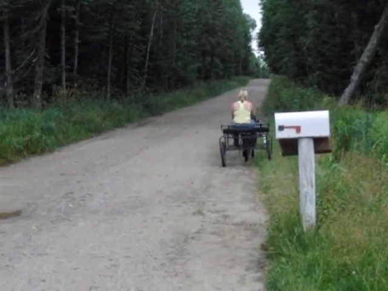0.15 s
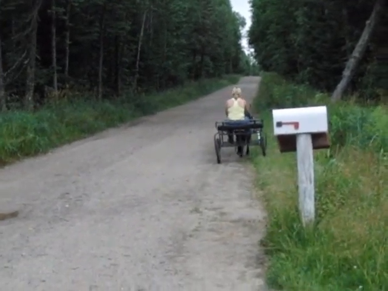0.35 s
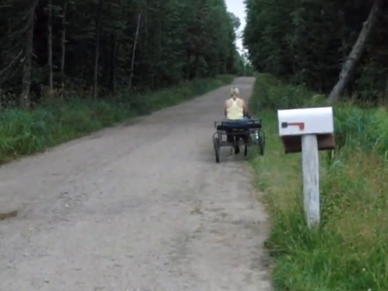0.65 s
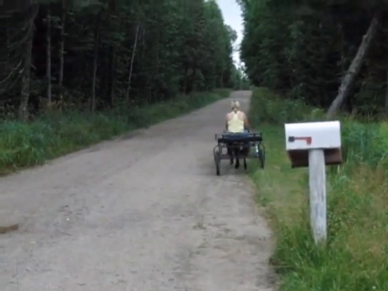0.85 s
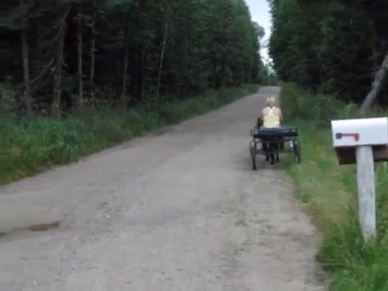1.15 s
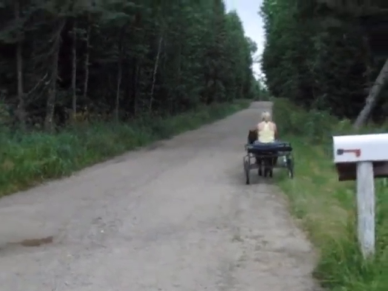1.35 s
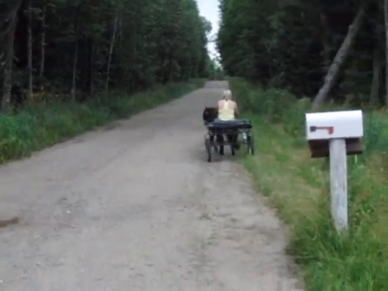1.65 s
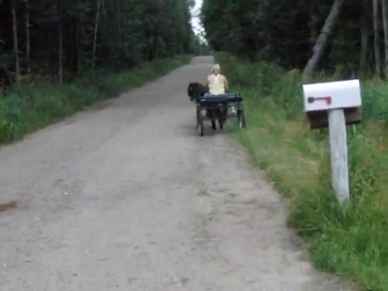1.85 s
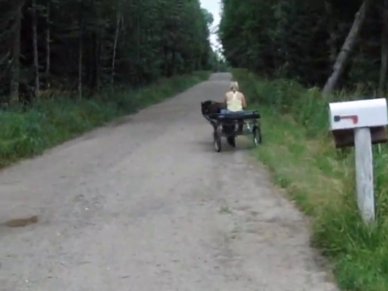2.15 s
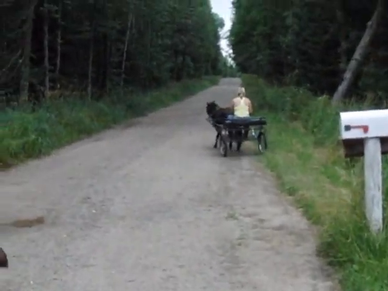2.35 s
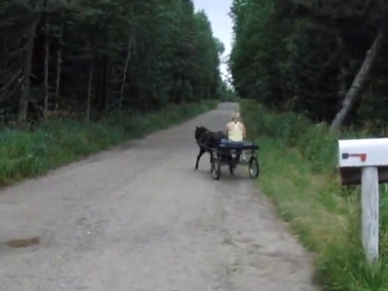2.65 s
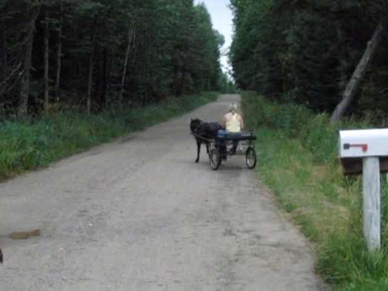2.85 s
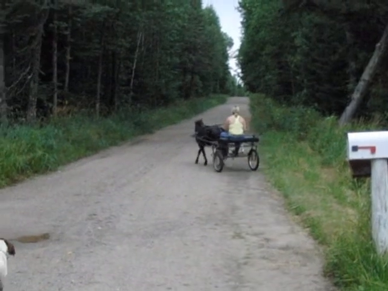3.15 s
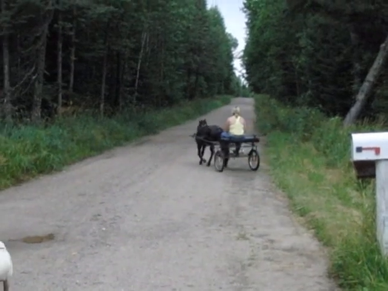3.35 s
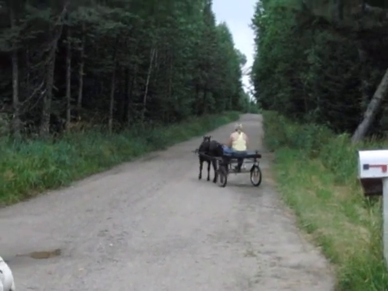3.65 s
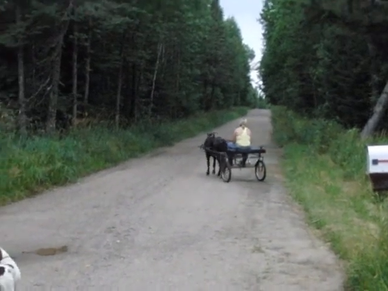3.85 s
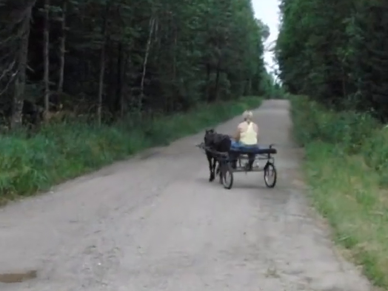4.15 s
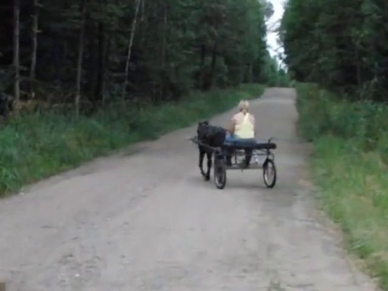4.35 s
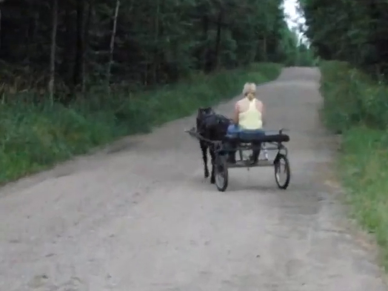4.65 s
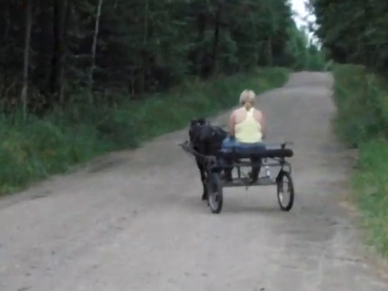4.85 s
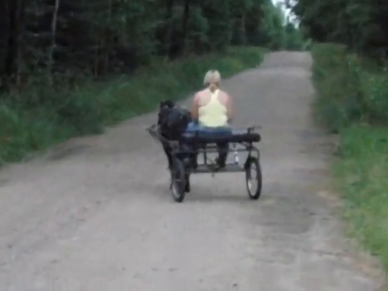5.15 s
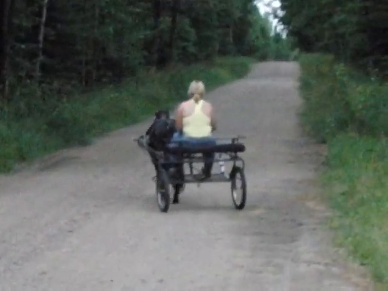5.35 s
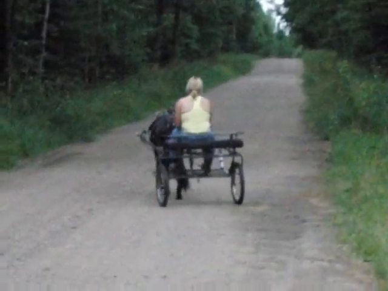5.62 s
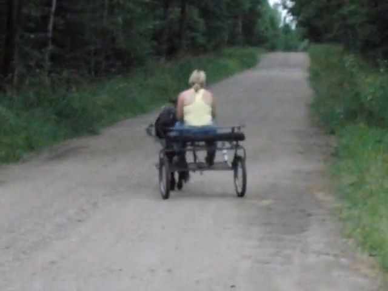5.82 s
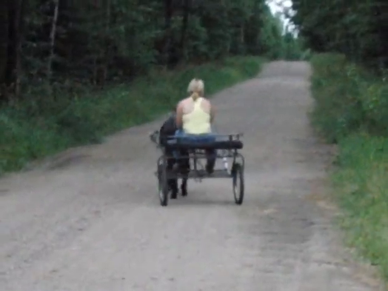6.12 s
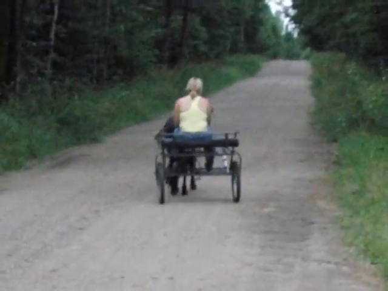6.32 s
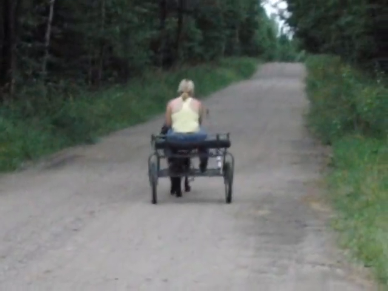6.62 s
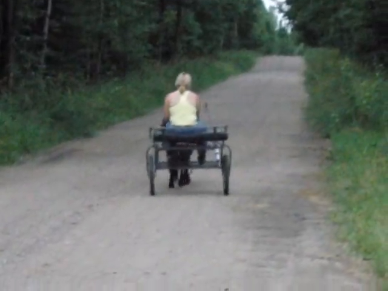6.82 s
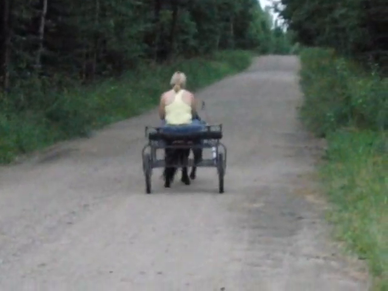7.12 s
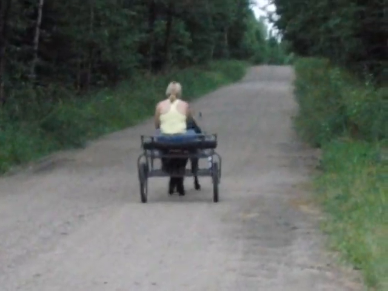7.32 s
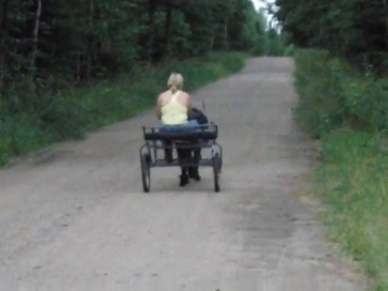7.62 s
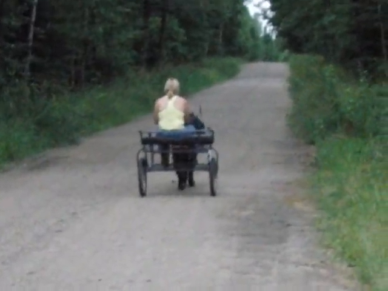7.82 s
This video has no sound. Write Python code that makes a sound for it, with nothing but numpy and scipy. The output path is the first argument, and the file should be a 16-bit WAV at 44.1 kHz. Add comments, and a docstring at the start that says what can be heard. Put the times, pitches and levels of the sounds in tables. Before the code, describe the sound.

A small horse pulls a cart away along a gravel road, hooves crunching and stones cracking under steady hiss, then one sharp loud snap close by.

```python
"""Over a small camera's hiss, a pony walks a two-wheeled cart away along a gravel road in the woods.
From the start tyres tick through pebbles, hooves crunch grit, stones ring briefly, and trees echo it all;
an earlier call of a far bird still rings. Soft buffets of pressure follow near 1 s.
Near 3.7 s fingers stick and slip on the camera; the bird calls twice more in arching notes.
At 5.2 s one sharp snap rings the case and ducks the gain, which creeps back as the cart walks on."""
import sys
import numpy as np
from scipy import signal
from scipy.fft import rfft, irfft
from scipy.io import wavfile
from scipy.ndimage import uniform_filter1d

SR = 44100
rng = np.random.default_rng(int(sys.argv[2]) if len(sys.argv) > 2 else 0)


def materialize(psi):
    """Save the field psi as 16-bit PCM at rate SR to the path in sys.argv[1].

    A 1-D psi becomes a single channel; in a 2-D psi each row is a channel.
    """
    bounded = np.clip(np.atleast_2d(psi).T, -1, 1)
    quanta = np.round(bounded * 32767).astype(np.int16)
    wavfile.write(sys.argv[1], SR, quanta)


N = 351918
TIME, HZ = np.arange(N) / SR, np.fft.rfftfreq(N, 1 / SR)


def gain_of(db):
    """Decibels to amplitude."""
    return 10 ** (np.asarray(db) / 20)


def evened(x):
    """Scales to rms 1."""
    return x / np.sqrt(np.mean(x ** 2) + 1e-20)


def read(points, hz):
    """A spectrum joined by straight lines over log frequency."""
    f, value = np.transpose(points)
    return np.interp(np.log(hz + 1), np.log(f + 1), value)


def bells(rows, hz):
    """Peaks and notches summed in dB."""
    return sum(db / (1 + (2 * (hz - f) / width) ** 2) for f, width, db in rows)


def coloured(x, points):
    """Gives a sound a spectrum, at rms 1."""
    spectrum = rfft(x) * gain_of(read(points, np.fft.rfftfreq(len(x), 1 / SR)))
    return evened(irfft(spectrum, len(x)))


def add(mix, s, sound):
    """Mixes a sound in at a time in seconds."""
    part = mix[max(round(s * SR), 0):][:len(sound)]
    part += sound[:len(part)]


def decay(t, t60):
    """An exponential fade that falls 60 dB in t60 seconds."""
    return np.exp(-np.log(1000) * t / t60)


def stroke(t, length):
    """A rounded, flat-topped envelope."""
    return np.sqrt(np.maximum(np.sin(np.pi * np.minimum(t / length, 1)), 0))


def grit(count, per_s, spread_db):
    """Random clicks of either sign, their sizes spread unevenly in dB."""
    size = gain_of(spread_db * np.minimum(rng.exponential(1, count), 4))
    struck = rng.random(count) < per_s / SR
    return size * rng.choice([-1, 1], count) * struck


# Steady noise reaching the microphone. Each row: frequency in Hz, density in dB per Hz.
HISS_SPECTRUM = [(20, -95), (60, -90), (120, -86), (200, -91.5), (300, -93.5), (500, -97), (950, -100.5),
                 (1400, -99), (2000, -100), (3000, -99.5), (5000, -98.5), (9000, -98.5), (15500, -99)]
# Narrow whining peaks of the hiss. Each row: frequency in Hz, width in Hz, lift in dB.
WHINE_PEAKS = [(5168, 175, 10), (4922, 250, 8)]
# Strength of the low rumble of moving air. Each row: time in seconds, gain in dB.
BREEZE_GAIN = [(0, 1.5), (2.5, -4.5), (5.1, -2), (7.9, 0)]


def hiss(flutter_hz=19.0, flutter=0.2, flutter_centre_hz=11400, flutter_width_hz=1300, rumble_hz=130):
    """Shaped noise gives outdoor rumble and the camera's own whining hiss, whose top flutters."""
    density_db = read(HISS_SPECTRUM, HZ) + bells(WHINE_PEAKS, HZ)
    spectrum = rfft(rng.standard_normal(N)) * gain_of(density_db) * np.sqrt(SR / 2)
    low_share = np.exp(-(HZ / rumble_hz) ** 2)
    breeze = gain_of(np.interp(TIME, *np.transpose(BREEZE_GAIN)))
    rumble = irfft(spectrum * low_share, N) * breeze
    steady = irfft(spectrum * (1 - low_share), N)
    top = irfft(spectrum * np.exp(-((HZ - flutter_centre_hz) / flutter_width_hz) ** 2), N)
    return rumble + steady + flutter * top * np.sin(2 * np.pi * flutter_hz * TIME)


# The cart draws away at a walk; tyres, even steps and flicked stones fade as 1 / distance.
START_M, SPEED_M_PER_S = 12.8, 1.0


def nearness():
    """Gain of the receding cart at every moment, 1 at the start."""
    return START_M / (START_M + SPEED_M_PER_S * TIME)


# Colour of gravel under the tyres. Each row: frequency in Hz, relative level in dB.
GRAVEL_COLOUR = [(100, 1.5), (400, -1), (900, -2.5), (1400, 1), (2000, -5.5), (3200, 3), (5000, -9.5),
                 (8000, 3.5), (15000, -21)]
TYRES_DB = -60.5  # at the starting distance, between clumps and gaps


def tyres(clump_db=3.0, cycles=0.92):
    """Pebbles of many sizes tick under the tyres, in clumps; smaller ones ring higher and shorter."""
    t, ticks = np.arange(256) / SR, np.zeros(N)
    for hz in np.geomspace(600, 7000, num=10):
        tick = np.sin(2 * np.pi * hz * t) * np.exp(-hz * t / cycles)
        pebbles = np.convolve(grit(N, per_s=200, spread_db=3.5), tick)[:N]
        ticks += evened(pebbles) * np.sqrt(hz)
    knots = np.linspace(0, TIME[-1], num=200)
    clumps = np.interp(TIME, knots, rng.standard_normal(len(knots)))
    return coloured(ticks, GRAVEL_COLOUR) * nearness() * gain_of(TYRES_DB + clump_db * clumps)


def woods(x, t60, gap=0.031):
    """Sparse random echoes that build up over the gap in seconds and die away."""
    t = np.arange(SR) / SR
    taps = grit(SR, per_s=900, spread_db=-1.0) * decay(t, t60) * np.minimum(t / gap, 1)
    return signal.fftconvolve(x, taps / np.linalg.norm(taps))[:len(x)]


# The far bird's calls; a negative start leaves only its echo. Each row: start in seconds, level in dB.
CALLS = [(-.2, -50), (3.889, -52), (4.409, -50.5)]
# The note is one arch of pitch, lower at both ends by the share SAG.
# Outside the middle share CLEAR the voice breaks lower by the factor BREAK.
NOTE_S, TOP_HZ, SAG, CLEAR, BREAK = .117, 1533, .34, .68, .78


def bird(throat_hz=1580, throat_width_hz=700, second=0.8, echo_db=-5):
    """An arching note whose first two harmonics sweep through one throat resonance, echoing in the woods."""
    t = np.arange(0, NOTE_S, 1 / SR)
    from_top = abs(2 * t / NOTE_S - 1)
    register = uniform_filter1d(np.where(from_top < CLEAR, 1., BREAK), size=220)
    hz = TOP_HZ * (1 - SAG * from_top ** 2) * register
    turns = np.cumsum(hz) / SR
    note = np.zeros(len(t))
    for harmonic, size in [(1, 1), (2, second)]:
        throat = np.exp(-(2 * (harmonic * hz - throat_hz) / throat_width_hz) ** 2)
        note += size * np.sin(2 * np.pi * harmonic * turns) * throat
    calls = np.zeros(N + SR)  # one second of lead, so that an earlier call still rings
    for s, db in CALLS:
        add(calls, s + 1, gain_of(db) * np.sqrt(2) * note * stroke(t, t[-1]))
    echoes = woods(calls, t60=2.1, gap=0.043)
    return (calls + gain_of(echo_db) * echoes)[SR:]


def stone(hz, t60, crack=0.36, crack_t60=0.011, dull_db=-10):
    """A pinched stone gives a short dead ring and a spit of grit."""
    t = np.arange(2048) / SR
    ring = np.sin(2 * np.pi * hz * t) * decay(t, t60)
    spit_colour = [(400, dull_db), (1300, 0.73), (6000, -1.5), (10000, dull_db)]  # Hz, dB
    spit = coloured(rng.choice([-1., 1.], len(t)), spit_colour)
    return ring + crack * spit * decay(t, crack_t60)


# Stones that crack under a hoof or tyre. Each row: start in seconds, level of the ring in dB, ring in Hz.
CRACKS = [(.224, -37.5, 1740), (.8573, -37, 1390), (.9152, -33, 2970), (.9658, -36, 2800),
          (1.013, -33.5, 3120), (1.6443, -35, 1470), (1.8405, -35, 3800), (2.0583, -34, 1610),
          (2.0915, -33, 2820), (2.4657, -42, 3040), (2.6407, -42, 2620), (2.8517, -40, 2800),
          (5.731, -33.5, 2600), (6.8428, -31.5, 2030), (7.5764, -34, 2400)]
# A hoof knocks hollow on a stone. Each row: start in seconds, level of the ring in dB, ring in Hz.
HOLLOW_CLOPS = [(.8968, -29, 1240), (6.8435, -47, 625)]
CLOP_T60_S, STONE_T60_S = 0.022, 0.0051
# Smaller stones flicked aside at random: average rate, and the middle of their levels and pitches.
FLICKS_PER_S, FLICK_DB, FLICK_HZ = 2.5, -43, 2860


def stones(spread_db=3.0, spread_octaves=0.34):
    """Hollow clops ring longer than dry cracks; small stones are flicked at random and recede."""
    loud, flicks = np.zeros(N), np.zeros(N)
    for rows, t60 in [(HOLLOW_CLOPS, CLOP_T60_S), (CRACKS, STONE_T60_S)]:
        for s, db, hz in rows:
            add(loud, s, gain_of(db) * stone(hz, t60))
    for when, size, pitch in rng.uniform(-1, 1, (round(FLICKS_PER_S * TIME[-1]), 3)):
        flick = stone(FLICK_HZ * 2 ** (spread_octaves * pitch), STONE_T60_S)
        add(flicks, TIME[-1] * (when + 1) / 2, gain_of(FLICK_DB + spread_db * size) * flick)
    return loud + flicks * nearness()


def crunch(length, centre_hz, rise=0.18, skirt_db=5, deepest_db=21):
    """A hoof grinds a burst of grains that swells quickly and thins out."""
    t = np.arange(16384) / SR
    octaves = np.log2((np.fft.rfftfreq(len(t), 1 / SR) + 1) / centre_hz)
    colour_db = -deepest_db * np.tanh(skirt_db * octaves ** 2 / deepest_db)
    clicks = grit(len(t), per_s=2200, spread_db=2.5)
    grains = evened(irfft(rfft(clicks) * gain_of(colour_db)))
    return grains * np.minimum(t / (rise * length), 1) * np.exp(-(t / length) ** 3)


# Hooves that dig in or drag. Each row: start in seconds, length in seconds, level in dB,
# centre of the grit in Hz, dull push under the grit in dB relative to it.
HOOF_SCUFFS = [(0.839, .08, -54.5, 2400, -10), (0.913, .16, -52, 2520, -4.5), (1.08, 0.083, -56, 1100, -3),
               (1.595, 0.024, -39.5, 3280, -13.5), (1.607, 0.21, -52, 3100, -10),
               (2.041, 0.041, -51, 1590, -7), (2.09, 0.057, -50.5, 2600, 0.5), (2.13, .017, -47, 1310, -5),
               (3.28, 0.042, -58.5, 2800, -18), (3.508, .03, -54, 1790, -14),
               (5.095, 0.036, -56.5, 1990, -14), (6.659, 0.024, -50.5, 3100, -18),
               (7.424, 0.023, -56.5, 3800, -18)]
PUSH_HZ = 610  # centre of the dull push of a hoof into the road bed
# The pony's even walk: a soft crunch at every step, its level given at the starting distance.
FIRST_STEP_S, STEP_S, STEP_JITTER_S = .28, .331, .015
STEP_LENGTH_S, STEP_DB, STEP_HZ = 0.054, -59.5, 2430


def hooves():
    """Soft, even steps that recede, and harder scuffs that also push into the road bed."""
    steps, scuffs = np.zeros(N), np.zeros(N)
    for s in np.arange(FIRST_STEP_S, TIME[-1], STEP_S):
        step = gain_of(STEP_DB) * crunch(STEP_LENGTH_S, STEP_HZ)
        add(steps, s + STEP_JITTER_S * rng.standard_normal(), step)
    for s, length, db, centre_hz, push_db in HOOF_SCUFFS:
        push = gain_of(push_db) * crunch(length, PUSH_HZ)
        add(scuffs, s, gain_of(db) * (crunch(length, centre_hz) + push))
    return steps * nearness() + scuffs


# Soft low buffets on the microphone. Each row: start in seconds, length in seconds, level in dB, swing in Hz.
SOFT_BUFFETS = [(0.919, 0.064, -52.5, 70), (.985, 0.085, -52.5, 62.4), (1.124, .05, -59, 50),
                (1.181, .06, -57.5, 115)]


def buffets(rough=0.92):
    """A few slow swings of pressure, made uneven by low noise."""
    out, t = np.zeros(N), np.arange(8192) / SR
    eddy_colour = [(20, -3), (90, 4.0), (350, -12.0), (1500, -33)]  # Hz, dB
    for s, length, db, hz in SOFT_BUFFETS:
        eddies = coloured(rng.standard_normal(len(t)), eddy_colour)
        swing = np.sin(2 * np.pi * hz * t)
        add(out, s, gain_of(db) * stroke(t, length) * (swing + rough * eddies))
    return out


# Fingers sliding and snapping on the camera. Each row: start in seconds, length in seconds, level in dB,
# share of case knock in the power from 0 to 1.
FINGER_RUBS = [(3.666, .024, -43, 0.2), (3.6706, 0.01, -56, .7), (3.728, 0.084, -43.5, 0.03),
               (3.744, 0.033, -47, 0), (3.809, 0.024, -47.5, 0.3), (5.173, 0.047, -53.5, .1),
               (5.213, 0.026, -42.5, 0.03)]
# Colour of sliding skin. Each row: frequency in Hz, relative level in dB.
SLIDE_COLOUR = [(100, -9), (1200, -19), (2200, -1.5), (3200, -6), (4600, -0.5), (5700, 5), (7000, 4),
                (8500, -10), (15000, -11.5)]
# Colour of the knocked case. Each row: frequency in Hz, relative level in dB.
KNOCK_COLOUR = [(60, 5), (250, 7), (700, 9), (1200, 3), (2000, -4.5), (3000, -12), (5000, -1), (8000, -12),
                (15000, -28)]


def fingers():
    """Skin sticks and slips on the camera in dense clicks, mixed with the knock of the case."""
    out, t = np.zeros(N), np.arange(8192) / SR
    for s, length, db, share in FINGER_RUBS:
        slide = coloured(grit(len(t), per_s=6000, spread_db=3), SLIDE_COLOUR)
        knock = coloured(rng.choice([-1., 1.], len(t)), KNOCK_COLOUR)
        rub = np.sqrt(1 - share) * slide + np.sqrt(share) * knock
        add(out, s, gain_of(db) * stroke(t, length) * rub)
    return out


# Ticks and catches of the camera's plastic. Each row: start in seconds, level in dB, factor on the ring time.
PLASTIC_CATCHES = [(3.6722, -38, .4), (3.825, -33, 0.48), (5.2322, -19, 0.62), (5.2353, -6.5, 0.94),
                   (5.2378, -0.5, 0.96), (5.2391, -16, 0.64)]
# What the case rings with. Each row: frequency in Hz, level in dB, t60 in seconds before a catch's factor.
CASE_MODES = [(605, -18, 0.022), (905, -29, 0.034), (1980, -17.5, 0.014), (2530, -25.5, 0.012),
              (2800, -31, 0.038), (3240, -26.5, 0.038), (3940, -24.5, 0.053), (4760, -3, 0.01),
              (5000, -2.5, 0.01), (5560, -5, 0.012)]
# Colour of the crack over the ring. Each row: frequency in Hz, relative level in dB.
SNAP_COLOUR = [(20, -38), (170, -20), (350, -1), (600, -1), (1200, -4.5), (1900, 8), (3000, -2.5),
               (4200, 12), (5500, 0), (7500, 6), (15000, -17)]


def snap(crack_db=-4, crack_t60=0.02, echo_db=-24, echo_t60=0.083):
    """Plastic catches and the case rings; several catches within milliseconds make one loud snap."""
    out, t = np.zeros(N), np.arange(4096) / SR
    for s, db, hold in PLASTIC_CATCHES:
        ring = np.zeros(len(t))
        for hz, mode_db, t60 in CASE_MODES:
            ring += gain_of(mode_db) * decay(t, t60 * hold) * np.sin(2 * np.pi * hz * t)
        crack = coloured(rng.choice([-1., 1.], len(t)), SNAP_COLOUR) * decay(t, crack_t60 * hold)
        add(out, s, gain_of(db) * (ring + gain_of(crack_db) * crack))
    # the snap carries little bass
    out = signal.sosfilt(signal.butter(2, 420, "highpass", fs=SR, output="sos"), out)
    # close surroundings return a dull tail
    dull = signal.sosfilt(signal.butter(2, 3000, fs=SR, output="sos"), out)
    return out + gain_of(echo_db) * woods(dull, t60=echo_t60, gap=0.0039)


def scene(road_echo_db=-15):
    """The cart on the road with its echo, the bird, and the noises at the camera."""
    road = tyres() + stones() + hooves()
    road += gain_of(road_echo_db) * woods(road, t60=0.76)
    at_camera = hiss() + buffets() + fingers() + snap()
    return (road + bird() + at_camera)[None]


# Peaks and notches of the cavity in front of the microphone. Each row: frequency in Hz, width in Hz, gain in dB.
CAVITY_BELLS = [(1350, 160, 2), (2830, 1120, 6.5), (4052, 243, -15.5), (5196, 870, 11.5), (5850, 350, 4),
                (6320, 355, -15.5), (7850, 530, -11), (10200, 590, -7.5), (11300, 1350, 4)]
# The slope they stand on. Each row: frequency in Hz, gain in dB.
CAVITY_SLOPE = [(20, -0.5), (4500, -2), (6000, -3), (7000, -9), (8500, -11.5), (15500, -11.5)]


def cavity(x):
    """The microphone port colours the sound as a causal, minimum-phase filter."""
    hz = np.fft.rfftfreq(4096, 1 / SR)
    log_gain = np.log(gain_of(read(CAVITY_SLOPE, hz) + bells(CAVITY_BELLS, hz)))
    circle = np.r_[log_gain, log_gain[-2:0:-1]]
    # the Hilbert transform of the log gain supplies the phase
    taps = np.fft.ifft(np.exp(np.conj(signal.hilbert(circle)))).real
    return signal.oaconvolve(x, taps[:len(taps) // 2])[:N]


# The recorder's own low noise, which the gain control does not duck.
# Each row: frequency in Hz, relative level in dB.
LOW_NOISE_COLOUR = [(20, -7), (60, -3), (130, 0), (250, -13.5), (1000, -43)]
LOW_NOISE_DB = -72
EDGE_HZ = 15850  # upper band limit


def record(dry, threshold_db=-30, range_db=9.0, recovery_db_per_s=3.0, ceiling=0.25):
    """Gain control drops at once and recovers slowly; then port colour, soft overload, low noise, band limit."""
    power_db = 10 * np.log10(abs(uniform_filter1d(dry[0] ** 2, size=300)) + 1e-12)
    wanted_db = np.clip(power_db - threshold_db, 0, range_db)
    # holding the highest wanted duck on a rising ramp makes it recover in a straight line of dB
    ramp_db = TIME * recovery_db_per_s
    duck_db = np.maximum.accumulate(wanted_db + ramp_db) - ramp_db
    heard = ceiling * np.tanh(cavity(dry[0] / gain_of(duck_db)) / ceiling)
    heard += gain_of(LOW_NOISE_DB) * coloured(rng.standard_normal(N), LOW_NOISE_COLOUR)
    low_pass = signal.firwin(511, EDGE_HZ, window=("kaiser", 9), fs=SR)
    return signal.oaconvolve(heard, low_pass, "same")[None]


dry = scene()
out = record(dry)
materialize(out)
```